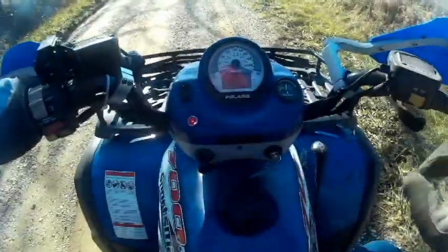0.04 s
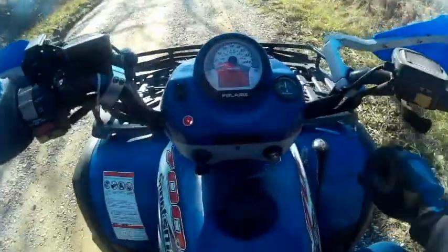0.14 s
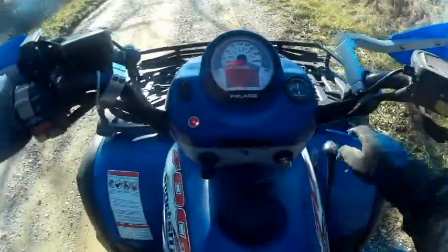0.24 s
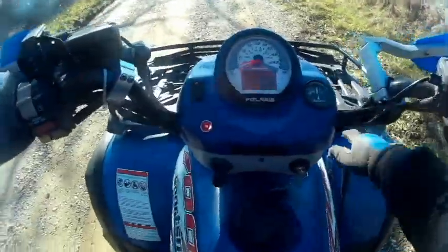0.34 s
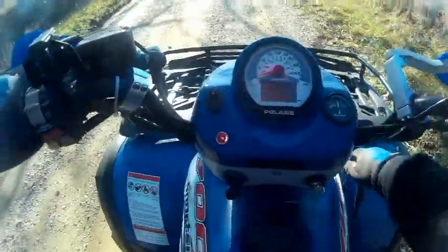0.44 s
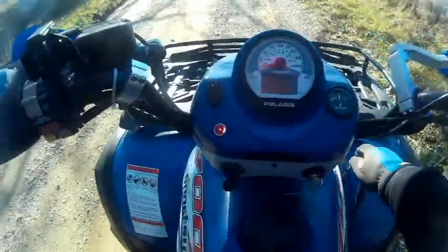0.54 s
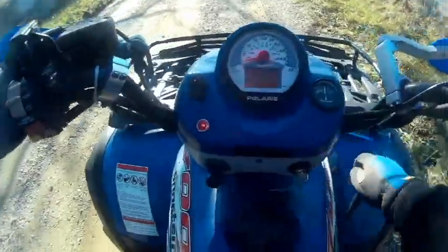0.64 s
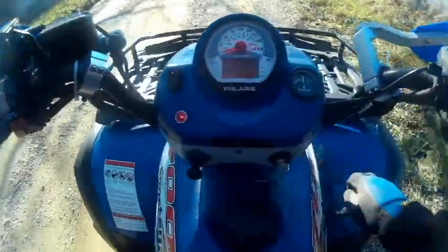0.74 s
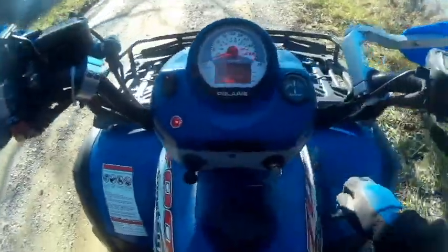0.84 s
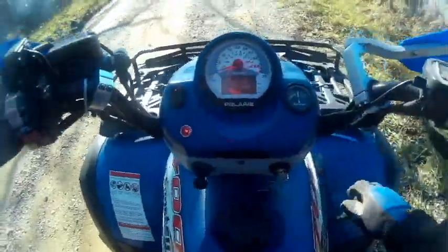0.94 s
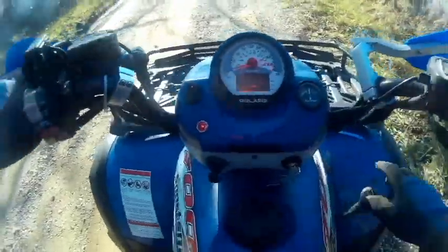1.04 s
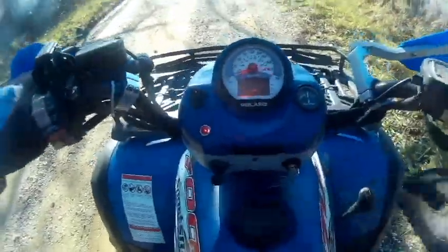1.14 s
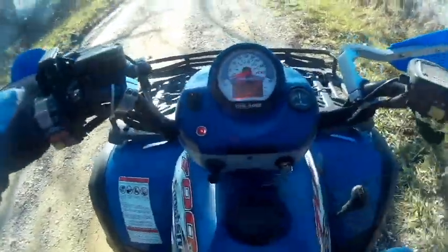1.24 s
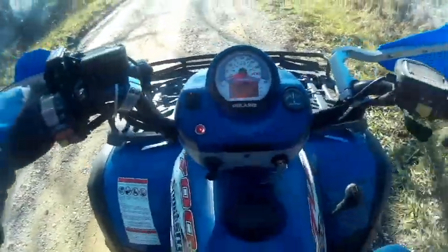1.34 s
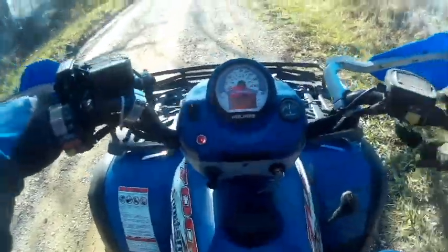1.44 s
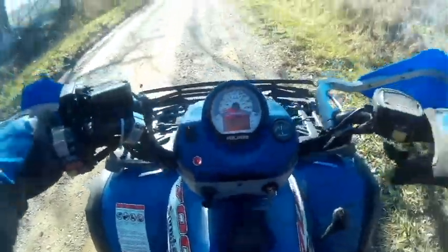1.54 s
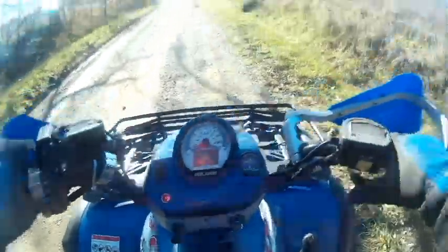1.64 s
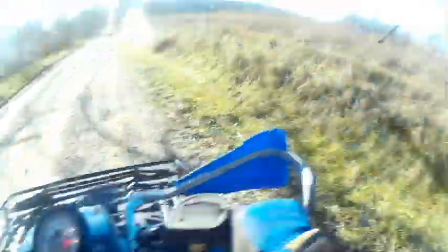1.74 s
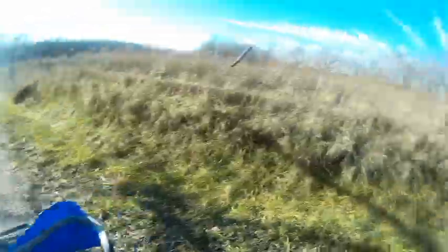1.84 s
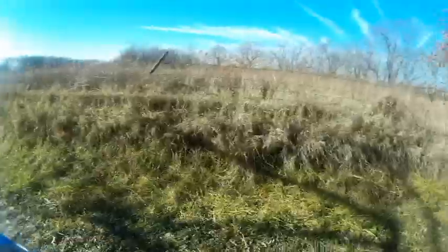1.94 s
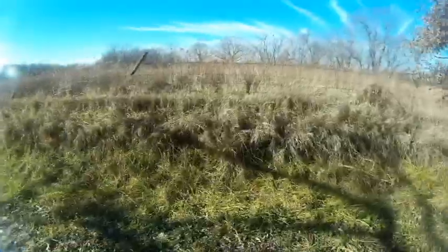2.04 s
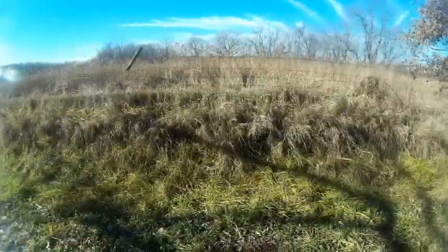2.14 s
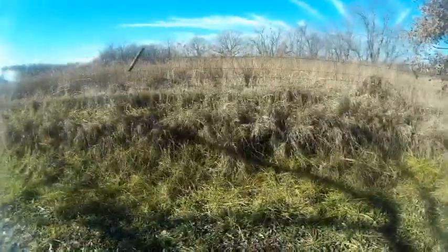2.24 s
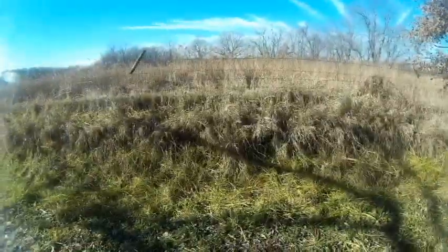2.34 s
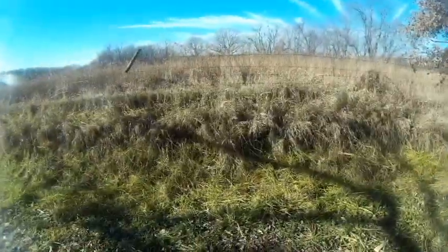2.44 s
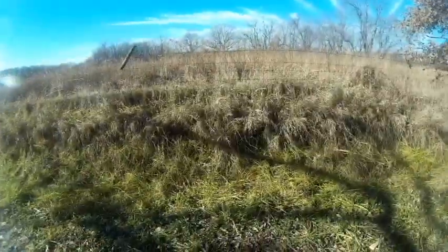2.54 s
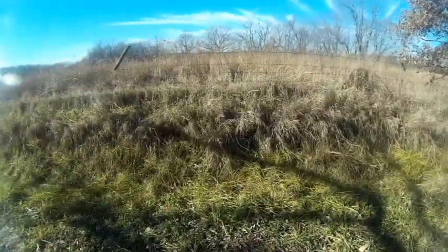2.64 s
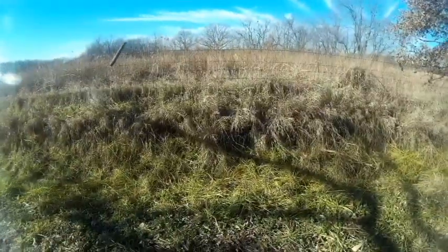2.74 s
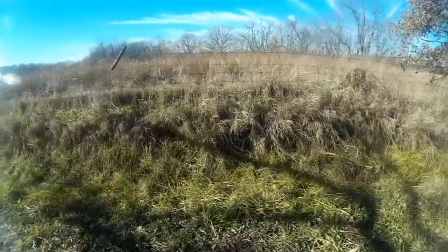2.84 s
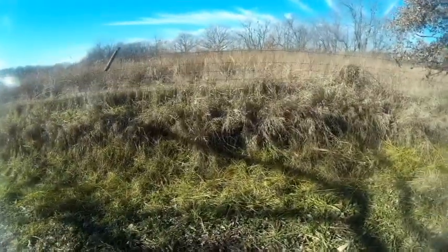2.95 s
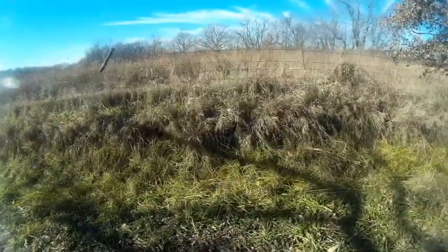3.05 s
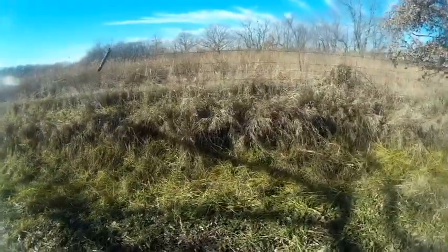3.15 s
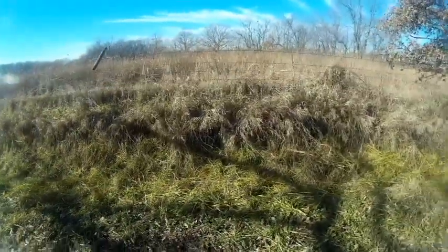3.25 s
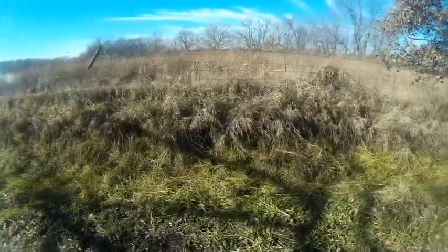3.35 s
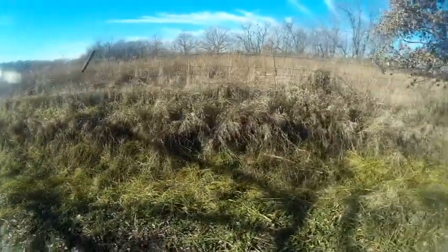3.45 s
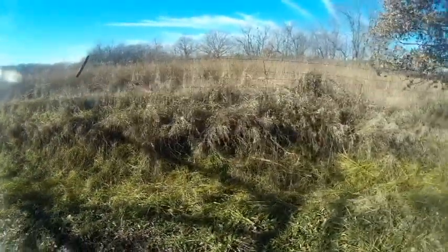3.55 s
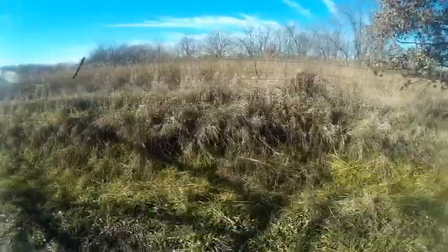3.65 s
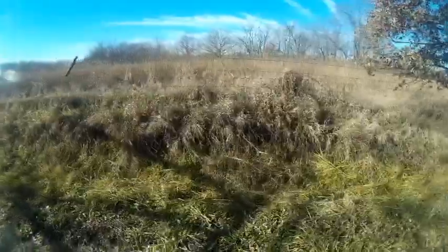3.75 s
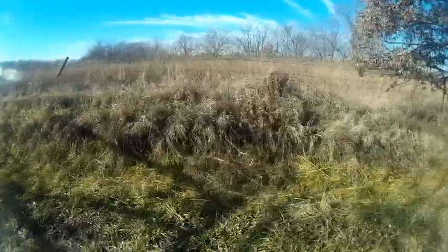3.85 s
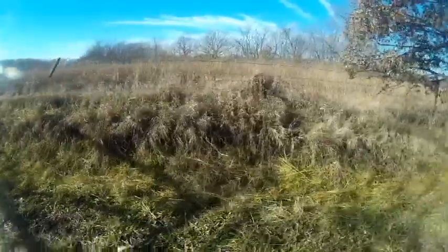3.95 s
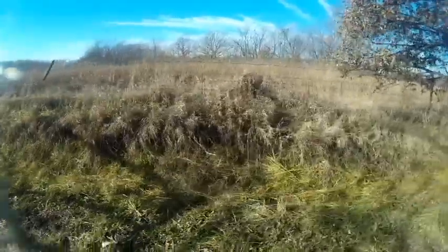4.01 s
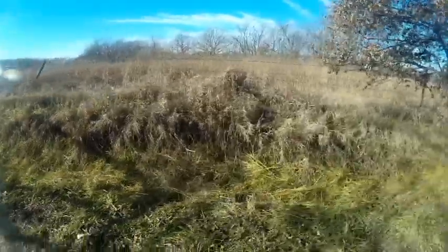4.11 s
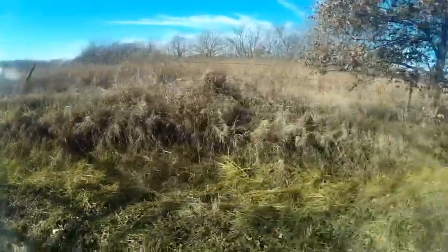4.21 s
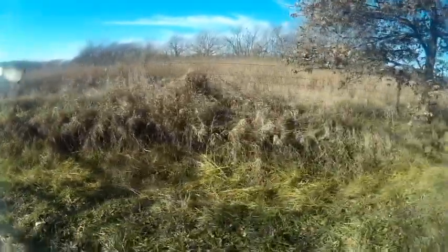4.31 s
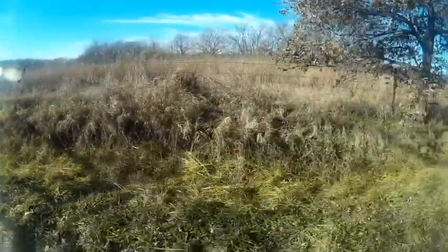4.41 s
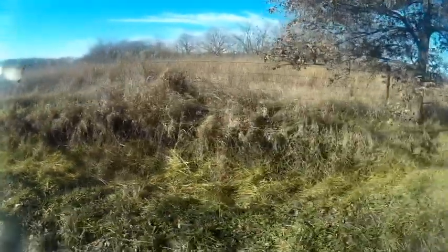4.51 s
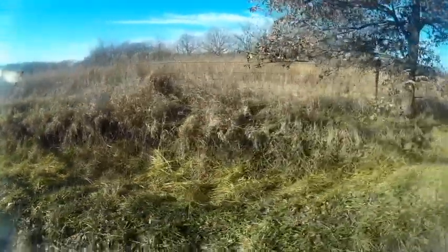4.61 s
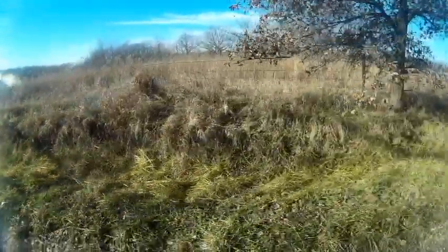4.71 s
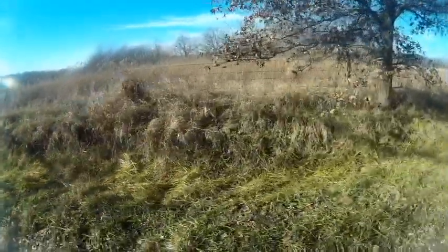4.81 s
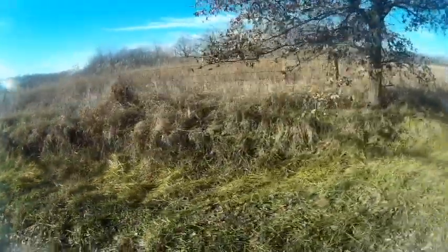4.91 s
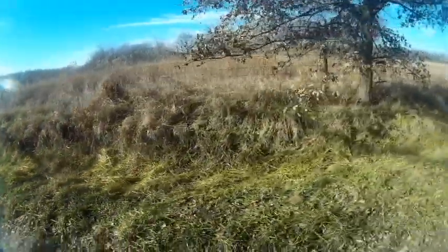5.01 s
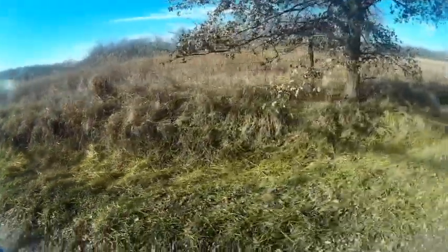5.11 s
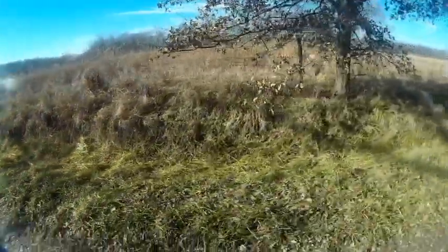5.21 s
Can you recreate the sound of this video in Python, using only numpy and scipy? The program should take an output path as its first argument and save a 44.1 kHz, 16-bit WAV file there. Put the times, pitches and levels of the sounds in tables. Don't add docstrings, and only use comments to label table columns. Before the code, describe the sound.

A lumpy low idle thumps in small groups with gaps, close and muffled. A metallic gear shift clunks with tiny chirps, followed by a cluster of plastic ticks as the helmet lifts. The engine then revs steadily upward, panels buzzing and valve gear hissing, peaks amid loud knocks, drops into sputtering misfires and swells once more. Soft wind buffets sit underneath; the dry open-air sound comes through a sealed helmet camera with faint whine.

```python
import sys
import numpy as np
from scipy import signal
from scipy.fft import rfft, irfft, next_fast_len
from scipy.io import wavfile
from scipy.ndimage import uniform_filter1d, map_coordinates

SR = 44100
rng = np.random.default_rng(int(sys.argv[2]) if len(sys.argv) > 2 else 0)


def level_to_linear(level):
    exponent = np.asarray(level, float) / 20
    return 10 ** exponent


def dump(signal):
    limited = np.clip(np.atleast_2d(signal).T, -1, 1)
    pcm = np.round(limited * 32767).astype(np.int16)
    wavfile.write(sys.argv[1], SR, pcm)


N = 232539


def unit(x):
    return x / np.sqrt(np.mean(x ** 2) + 1e-20)


def curves(rows, t):
    s, *columns = np.transpose(rows)
    return [np.interp(t, s, column) for column in columns]


def wobble(rate):
    knots = rng.standard_normal(int(N * rate / SR) + 4)
    return map_coordinates(knots, [np.arange(N) * rate / SR])


def on_log(spectrum, f):
    hz, db = np.transpose(spectrum)
    return level_to_linear(np.interp(np.log(f + 1), np.log(hz), db, -120, -120))


def noise(spectrum):
    size = next_fast_len(N)
    white = rfft(rng.standard_normal(size))
    return unit(irfft(white * on_log(spectrum, np.fft.rfftfreq(size, 1 / SR)), size)[:N])


def swells(rows, t):
    return sum(level_to_linear(db) * np.exp(-np.abs(t - s) / np.where(t < s, rise, fall)) for s, rise, fall, db in rows)


def add(track, s, sound):
    track[round(s * SR):][:len(sound)] += sound


def loudness(x, span_s):
    quiet_db = -38
    span = round(span_s * SR)
    power = np.abs(uniform_filter1d(x ** 2, span, origin=span // 2 - 1))
    return 10 * np.log10(power + 1e-9) - quiet_db


# frequency in Hz, density in dB per Hz.
CIRCUIT = [(2350, -35.5), (4000, -8), (8610, -9.5), (9220, -7.5), (9640, -9), (10300, -10), (14200, -12),
           (15500, -19.5)]


def electronics(t, heard):
    whine_hz, flips_hz, first_flip_s = 9525.372, 72.7166, .0131
    recent_db, settled_db = loudness(heard, .12), loudness(heard, 1.0)
    whine_db = np.minimum(-69.5 + .4 * recent_db, -62.5) + .1 * settled_db
    noise_db = -72.5 + .14 * recent_db + .12 * settled_db
    flips = np.sign(np.sin(np.pi * flips_hz * (t - first_flip_s)))
    whine = level_to_linear(whine_db) * flips * np.sin(2 * np.pi * whine_hz * t)
    return whine + level_to_linear(noise_db) * noise(CIRCUIT)


# frequency in Hz, density in dB per Hz.
BUFFET = [(16, -22), (26, -6), (38, 0), (55, -10), (90, -28), (200, -60)]
# peak time, rise and fall in seconds, level in dB.
GUSTS = [
    (.81, 0.046, .02, -39),
    (1.69, 0.23, .05, -46),
    (1.85, .04, .04, -40),
    (2.07, 0.052, .05, -47),
    (2.7, .3, .4, -46.5),
    (3.3, .04, .07, -57.5),
    (3.77, .04, .03, -52.5),
    (4.58, 0.22, 0.22, -52),
]


def wind(t):
    breeze_db = -65
    flutter = level_to_linear(1.5 + 1.5 * wobble(15))
    return (level_to_linear(breeze_db) + swells(GUSTS, t)) * flutter * noise(BUFFET)


# peak time, rise and fall in seconds, level in dB.
SCRAPES = [
    (.205, .002, .006, -58),
    (.7, 0.048, .03, -53.5),
    (.772, .008, 0.048, -47),
    (1.673, 0.0066, 0.0093, -46),
    (1.9, 0.073, 0.042, -47.5),
    (2.586, 0.0017, 0.0077, -37.5),
    (5.098, 0.0056, 0.046, -30.5),
]
# frequency in Hz, density in dB per Hz.
GRIT = [(300, -19.5), (800, 6), (1500, -7), (2800, -12), (4500, -31), (8000, -50), (12000, -71.5)]


def scrapes(t):
    return swells(SCRAPES, t) * level_to_linear(2 * wobble(300)) * noise(GRIT)


# start and length in seconds, start and end in Hz, level in dB.
SQUEAKS = [
    (0.687, 0.03, 4900, 4850, -61.5),
    (.711, .01, 4800, 3700, -65),
    (0.722, 0.016, 3520, 3600, -59),
    (0.738, 0.018, 4980, 4860, -60),
    (0.758, 0.0097, 4470, 3800, -54),
    (0.769, 0.007, 3880, 3240, -55),
    (0.77, 0.012, 2740, 2320, -58),
    (3.208, 0.05, 11760, 11900, -64),
    (3.17, 0.025, 11350, 11300, -88),
]


def squeaks():
    out = np.zeros(N + SR)
    for s, length, start_hz, end_hz, db in SQUEAKS:
        u = np.linspace(0, 1, round(length * SR))
        rasp = 1 + 3 * uniform_filter1d(rng.standard_normal(SR // 10), size=60)[:len(u)]
        turns = length * u * (start_hz + (end_hz - start_hz) * u / 2)
        add(out, s, level_to_linear(db) * np.sin(np.pi * u) * rasp * np.sin(2 * np.pi * turns))
    return out[:N]


# start in seconds, low mode in dB, upper modes over it in dB.
TICKS = [(0.124, -40.5, -8), (0.1794, -60, 6), (0.2068, -35.5, -7.5), (0.771, -46, -3), (1.417, -58, -9),
         (1.5469, -56, -5), (1.674, -36.5, -3.5), (1.794, -49.5, 7), (1.826, -51, 3), (1.84, -39, -8),
         (1.855, -36.5, -13), (1.8657, -42, -8), (1.886, -36, -13), (1.894, -40, -8), (1.9054, -36, -13),
         (1.92, -34, -13), (1.9494, -34, -10), (1.9804, -47, -1), (2.0384, -41, -15.5), (2.583, -45, -11),
         (5.0986, -26.5, -7)]
# frequency in Hz, T60 in seconds.
HOUSING = [(1500, 0.004), (2300, 0.0047), (3100, 0.0044), (4600, .004), (6300, .003)]


def ticks():
    out, t = np.zeros(N + SR), np.arange(SR // 10) / SR
    attack = 1 - np.exp(-t / .0003)
    for s, low_db, upper_db in TICKS:
        middle_db = low_db + upper_db
        high_db = middle_db - 16
        levels = (low_db, middle_db, middle_db, high_db, high_db - 13)
        for db, (hz, t60) in zip(levels, HOUSING):
            shifted_hz = hz * rng.uniform(.9, 1.1)
            add(out, s, level_to_linear(db + 9.5 - 60 * t / t60) * attack * np.sin(2 * np.pi * shifted_hz * t))
    return out[:N]


# start in seconds, peak in
# dB, frequency in Hz.
KNOCKS = [(0.662, -24, 437), (0.677, -26, 330), (0.723, -19, 495), (0.732, -29, 358), (0.766, -14, 347),
          (0.777, -14.5, 517), (0.789, -16, 354), (0.804, -20, 394), (0.816, -19.5, 464), (0.847, -22, 447),
          (2.476, -7, 458), (2.497, -11.5, 471), (3.796, -7, 443), (3.815, -17, 454), (3.854, 1.5, 384),
          (3.907, 4.5, 418), (3.919, -22, 447), (4.049, 2.5, 437), (4.074, -4, 380), (4.141, -4, 415),
          (4.236, -5, 442), (5.072, -13.5, 367), (5.093, -6.5, 377), (5.124, -5, 404)]
# start in seconds, peak in dB, frequency in Hz, T60 in seconds.
THUDS = [
    (0.662, -40, 169, 0.052),
    (1.764, -31.5, 167, 0.26),
]
# start in seconds, peak in dB, frequency in Hz, T60 in seconds.
SNAPS = [
    (2.5855, -48, 5200, .007),
    (2.586, -46, 3600, .008),
    (5.099, -47, 5000, .012),
]


def knocks():
    out, t = np.zeros(N + SR), np.arange(SR // 10) / SR
    knock_t60 = 0.043
    for s, db, hz, t60 in [(*knock, knock_t60) for knock in KNOCKS] + THUDS + SNAPS:
        modes = np.sin(2 * np.pi * hz * t)
        modes += .5 * np.sin(2 * np.pi * hz * rng.uniform(1.12, 1.28) * t)
        modes += .5 * np.sin(2 * np.pi * hz * .82 * t)
        attack = 1 - np.exp(-t * hz / 1.5)
        add(out, s, level_to_linear(db - 60 * t / t60) * attack * modes)
    return out[:N]


# time in seconds, level in dB.
SHAKE = [(0.0, -43), (0.83, -39), (1.33, -42), (1.61, -43), (2.16, -47), (2.48, -26.5), (2.57, -34),
         (2.86, -36), (3.3, -26.5), (3.48, -26.5), (3.95, -19), (4.23, -25), (4.56, -31), (4.84, -27),
         (5.27, -30)]
# frequency in Hz, density in dB per Hz.
PANELS_BELOW = [(71, -5), (120, -2), (162, -31), (232, -6), (289, -12.5), (342, 3), (393, -7), (439, -0.5),
                (597, -7), (641, -5.5), (701, -20.5), (766, -10), (855, -11), (993, -25.5), (1300, -28),
                (1690, -62), (2860, -120)]
# frequency in Hz, density in dB per Hz.
PANELS = [(190, -17.5), (320, -2), (339, -4.5), (455, -0.5), (494, -3), (530, -3), (572, -8), (723, -13),
          (857, -15), (953, -20), (1300, -25), (1690, -59.5), (2860, -120)]
# frequency in Hz, density in dB per Hz.
INTAKE = [(25, -16), (50, -1.5), (110, -7.5), (160, -4), (260, -1), (340, -13), (420, -51.5)]
# frequency in Hz, density in dB per Hz.
HISS = [(530, -49.5), (900, -7), (1260, -13.5), (1370, -6.5), (1600, -10), (2040, -10), (3230, -19.5),
        (3550, -21), (3820, -27), (4240, -26), (4880, -37), (5780, -34.5), (8500, -48.5), (11000, -73),
        (18700, -120)]


def bodywork(times, t):
    head_up_s, idle_rate = 1.68, 17
    cycles = np.concatenate([idling()[0], times])
    turns = np.interp(t, cycles, np.arange(len(cycles)))
    jolt = map_coordinates(rng.standard_normal(800), [2 * turns], order=1)
    beat = np.cos(2 * np.pi * turns - 1.5)
    shake_db, = curves(SHAKE, t)

    panel_db = shake_db + 2.4 * jolt + 0.77 * beat + 0.47 * wobble(25)
    panels = level_to_linear(panel_db) * np.where(t < head_up_s, noise(PANELS_BELOW), noise(PANELS))
    gulp = level_to_linear(0.57 * shake_db - 23.5 + 1.5 * wobble(17)) * noise(INTAKE)

    speed = np.interp(t, cycles[1:], 1 / np.diff(cycles))
    octaves = uniform_filter1d(np.log2(speed / idle_rate), size=SR // 5)
    pulling = uniform_filter1d(np.gradient(octaves) * SR, size=SR // 5)
    hiss_db = -62.5 + (13.5 - 1.5 * octaves) * octaves
    hiss_db += 0.5 * pulling + 0.09 * (shake_db - shake_db[0])
    hiss_db += 0.21 * jolt + 1.0 * beat + 0.89 * wobble(90) + 1.0 * wobble(7.1)
    return panels + gulp + level_to_linear(hiss_db) * noise(HISS)


# first firing in seconds, thump peak in dB, bark peak in dB, growth in dB a firing.
IDLE = [(0.01, -34, -30.5, 2.5), (0.281, -27.5, -30, -0.5), (0.535, -32.5, -32.5, 5),
        (0.794, -28.5, -26, -13), (1.056, -29, -30.5, 3.5), (1.232, -30, -30, 3), (1.353, -29, -29, -2.5),
        (1.526, -31, -31, 1.5), (1.821, -28.5, -27.5, 0), (2.043, -27, -28, 0.5), (2.208, -27, -24.5, 3)]
STROKES = "xx.. xx.. xx.. xx.. xx. xx xxx xxx.. xxx. xx. xx".split()


def idling():
    idle_ends_s = 2.306
    miss_thump_db, miss_bark_db, miss_fades_db = -36.5, -53.5, -12
    rows = []
    ends = [run[0] for run in IDLE[1:]] + [idle_ends_s]
    for (s, thump_db, bark_db, growth_db), end, strokes in zip(IDLE, ends, STROKES):
        for k, stroke in enumerate(strokes):
            if stroke == "x":
                sizes = thump_db + growth_db * k, bark_db + growth_db * k
            else:
                fade_db = miss_fades_db * (k - strokes.count("x"))
                sizes = miss_thump_db + fade_db, miss_bark_db + fade_db
            rows.append((s + (end - s) * k / len(strokes), *sizes))
    return np.transpose(rows)


# time in seconds, firings a second.
REV = [(2.28, 28.0), (2.4, 34.2), (2.6, 39.2), (3.05, 41.7), (3.24, 49.1), (3.59, 71.3), (3.69, 75.2),
       (3.9, 79.3), (4.03, 80.0), (4.26, 58.6), (4.36, 53.4), (4.58, 50.7), (4.79, 45.9), (4.95, 46.6),
       (5.11, 57.9), (5.27, 47.9)]
# time in seconds, thump in dB, bark in dB, brightness of the bark from 0 to 1.
LOAD = [(2.28, -30, -26.5, 0.4), (2.42, -23.5, -17.5, 0.57), (2.6, -27, -18, 0.65),
        (3.05, -25.5, -17, 0.46), (3.19, -27, -20.5, 0.37), (3.3, -26.5, -15, 0.55),
        (3.43, -27.5, -15, 0.61), (3.57, -27, -18, 0.67), (3.63, -24, -26, 0), (4.02, -22.5, -22.5, 0),
        (4.08, -19, -14.5, 0.56), (4.2, -26.5, -14.5, 0.37), (4.32, -23, -22, 0.97),
        (4.53, -27, -18.5, 0.71), (4.66, -26.5, -26.5, 0.5), (4.94, -25.5, -24.5, 0.6),
        (5.11, -24.5, -18.5, 0.66), (5.27, -25.5, -25, 1)]
# time in seconds, amount from 0 to 1.
UNEVEN = [(2.28, .1), (2.6, .04), (3.6, .04), (4.0, .07), (4.25, .12), (4.35, .2), (4.95, .16), (5.05, .08),
          (5.27, .12)]
# time in seconds, loss in dB, half width in seconds.
MISFIRE = [(4.04, -32, 0.0057), (4.133, -21, 0.0051), (4.286, -20, 0.032), (4.386, -18, 0.015),
           (4.473, -27, 0.023), (4.555, -34, 0.0083), (4.69, -28, 0.009), (4.845, -14, 0.015),
           (4.927, -29, 0.0092), (5.0, -20, 0.013), (5.143, -29, 0.0065)]


def firings():
    t = np.arange(round(2.297 * SR), N) / SR
    turns = np.cumsum(curves(REV, t)[0]) / SR
    times = t[np.searchsorted(turns, np.arange(int(turns[-1]) + 1))]
    thump_db, bark_db, bright = curves(LOAD, times)
    scatter = curves(UNEVEN, times)[0][:, None] * rng.standard_normal((len(times), 3))
    loss_db = sum(db * np.exp(-((times - s) / width) ** 2) for s, db, width in MISFIRE)
    energy = np.sqrt(SR / curves(REV, times)[0])
    thump = energy * level_to_linear(thump_db + loss_db + 3 * scatter[:, 0])
    bark = energy * level_to_linear(bark_db + 0.35 * loss_db + 6.4 * scatter[:, 1])
    slip = .002 * scatter[:, 2]
    return times, slip, thump, bark, np.clip(bright, 0, 1)


def imbalance(times, t):
    turns = np.interp(t, times, np.arange(len(times)))
    near_db = 4 * np.minimum(curves(REV, t)[0] - 77, 0)
    level = level_to_linear(-28.5 + near_db + 1.1 * wobble(8))
    return level * np.sin(4 * np.pi * turns) * (t > times[0])


def chamber(spectrum, sweep, tilt_db=0):
    f = np.fft.rfftfreq(16384, 1 / SR)
    delay = .05 + sweep * (np.minimum(f, 340) + .5 * np.clip(f - 340, 0, 400))
    lean = level_to_linear(tilt_db * np.clip((f - 250) / 50, -1, 1))
    phase = 2 * np.pi * np.cumsum(delay) * f[1]
    ring = irfft(on_log(spectrum, f) * lean * np.exp(-1j * phase))
    ring = ring / np.linalg.norm(ring)
    return ring, np.searchsorted(np.cumsum(ring ** 2), .5)


def struck(times, sizes, ring, lead):
    blows = np.bincount(np.round(times * SR).astype(int), sizes, N + SR)
    return signal.fftconvolve(blows, ring)[lead:lead + N]


# frequency in Hz, gain in dB.
BARK = [(140, -47.5), (165, -23.5), (195, -9.5), (215, -0.5), (250, 3.5), (290, -2.5), (325, -7.5),
        (365, -17.5), (400, -28), (440, -19), (480, -22), (520, -17.5), (580, -25.5), (700, -34)]


def tail_pipe(times, bark, bright, sweep):
    dull, lead = chamber(BARK, sweep, -7)
    sharp, _ = chamber(BARK, sweep, 7)
    return struck(times, bark * (1 - bright), dull, lead) + struck(times, bark * bright, sharp, lead)


# frequency in Hz, gain in dB.
THUMP = [(22, -43), (31, -24), (38, -3.5), (48, -8), (62, -6), (78, 1), (95, 2), (110, -0.5), (122, -16),
         (136, -39), (155, -64.5)]
# frequency in Hz, gain in dB.
IDLE_BARK = [(150, -51.5), (185, -17.5), (210, -6.5), (240, 7), (270, -1.5), (300, -7.5), (340, -42)]


def exhaust(times, slip, thump, bark, bright):
    idle_times, thump_db, bark_db = idling()
    low, low_lead = chamber(THUMP, .00013)
    high, high_lead = chamber(IDLE_BARK, .00012)
    idle = struck(idle_times, level_to_linear(thump_db) / low.max(), low, low_lead)
    idle += struck(idle_times + 0.00765, level_to_linear(bark_db) / high.max(), high, high_lead)

    coasting = (times >= 4.04) & (times < 4.29)
    barks = tail_pipe(times + slip, bark * ~coasting, bright, .00017)
    barks += tail_pipe(times + slip, bark * coasting, bright, .00007)

    hot = chamber([(hz * 1.182, db) for hz, db in THUMP], .00013)
    return idle + struck(times + .3 * slip, thump, *hot) + barks


def scene():
    t = np.arange(N) / SR
    times, *burning = firings()
    engine = exhaust(times, *burning) + imbalance(times, t) + bodywork(times, t)
    handling = knocks() + ticks() + squeaks() + scrapes(t)
    heard = engine + handling + wind(t)
    return (heard + electronics(t, heard))[None]


def roll_off(x):
    return signal.sosfilt(signal.butter(12, 15690, fs=SR, output="sos"), x)


def record(dry):
    duck_db, from_s, until_s, ease_s = -2, 3.905, 4.31, 0.021
    t = np.arange(N) / SR
    ducked = np.clip((t - from_s) / ease_s, 0, 1) * np.clip((until_s - t) / ease_s, 0, 1)
    return roll_off(dry * level_to_linear(duck_db * ducked))


dry = scene()
out = record(dry)
dump(out)
```